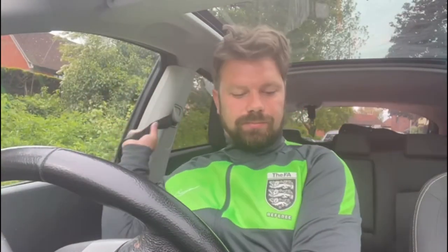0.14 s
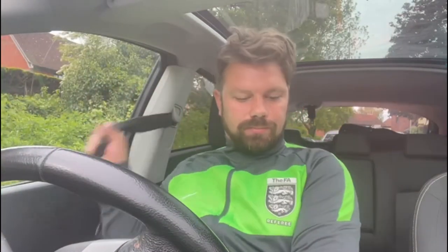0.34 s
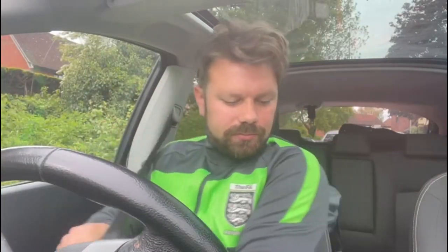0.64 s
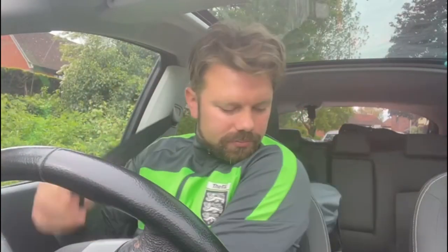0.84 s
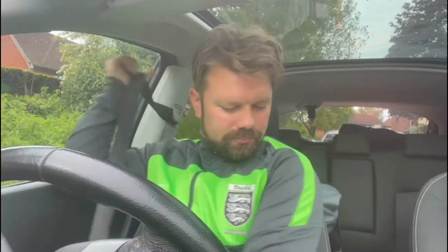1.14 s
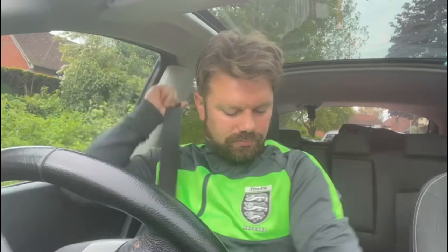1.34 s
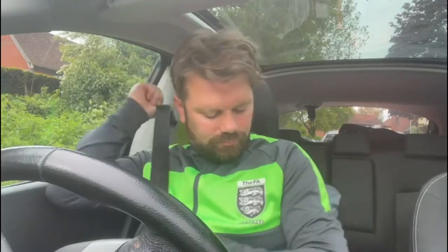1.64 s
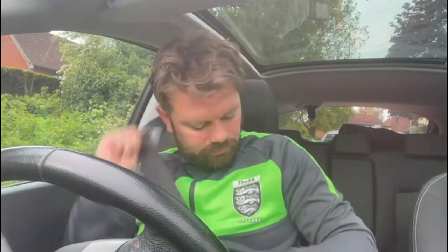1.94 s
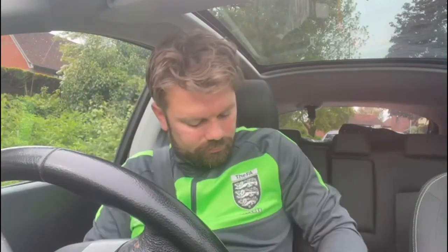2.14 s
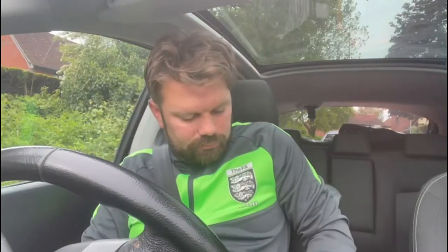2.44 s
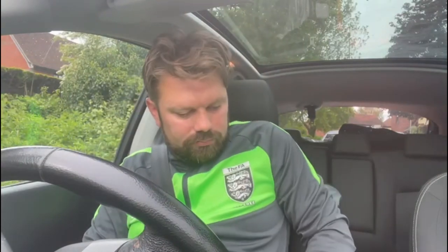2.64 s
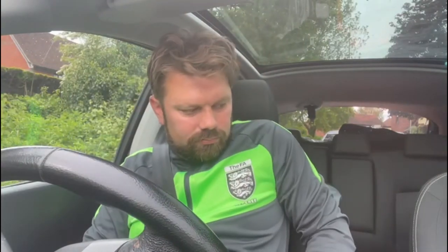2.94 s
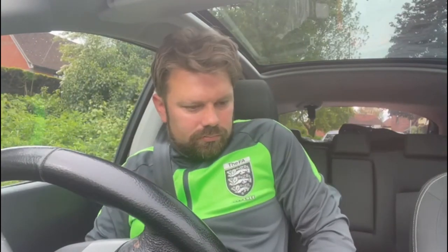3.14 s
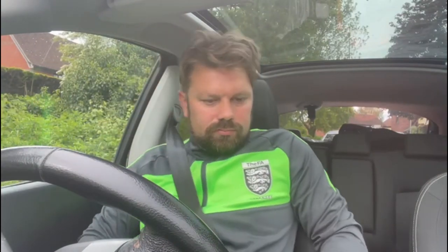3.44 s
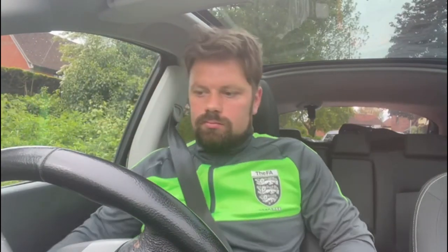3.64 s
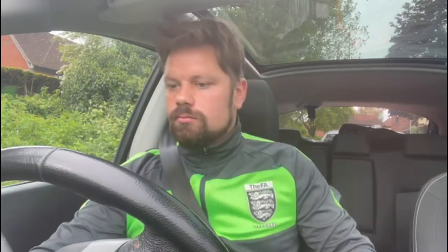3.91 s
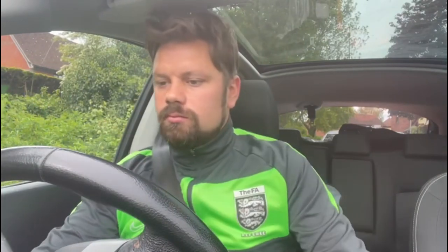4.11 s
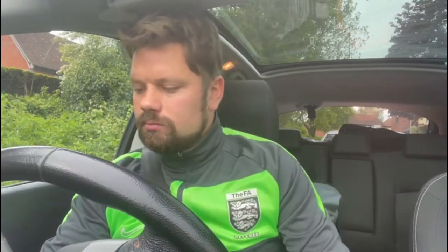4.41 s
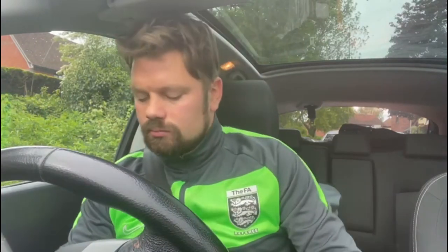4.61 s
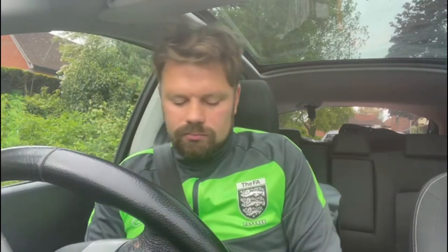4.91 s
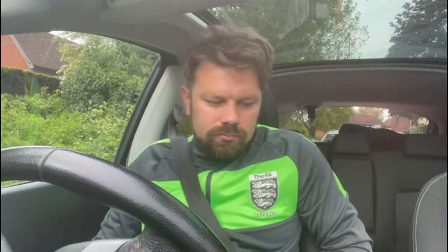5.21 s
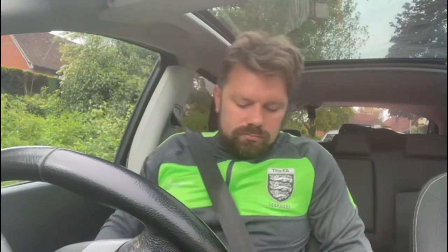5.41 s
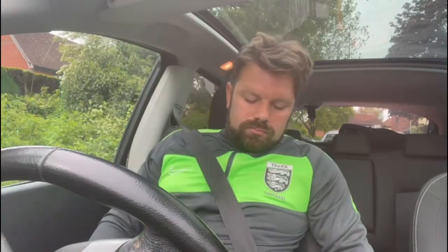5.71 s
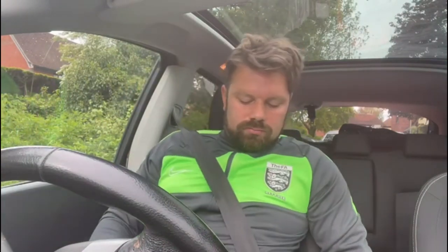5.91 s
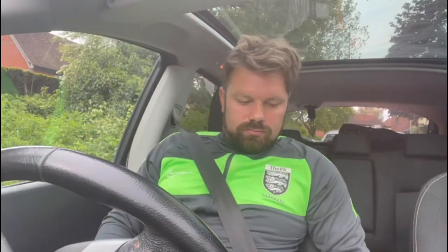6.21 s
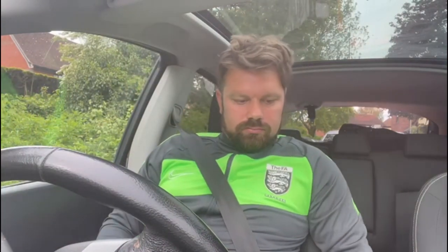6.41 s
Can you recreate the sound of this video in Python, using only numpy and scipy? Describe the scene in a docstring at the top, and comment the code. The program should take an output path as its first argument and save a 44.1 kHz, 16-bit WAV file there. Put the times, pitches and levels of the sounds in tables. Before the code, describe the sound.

Seat belt webbing zips through its guide in two rising and falling whines, followed by rattling buckle clicks, soft seat thumps and rustling clothes.

```python
"""Seat belt in a parked car

A driver pulls a seat belt out twice, fumbles the tongue into the buckle and settles back.
The ribs of the webbing whine over the guide loop as tones locked to belt speed; cloth, webbing and seat
move as filtered grainy noise, and scuffs as short noise swells. The metal tongue, plastic trim and cabin
answer blows as decaying modes, and thumps add a pitched push; two microphone ports listen."""
import sys
import numpy as np
from scipy import signal
from scipy.fft import rfft, irfft, next_fast_len
from scipy.io import wavfile

SR = 44100
rng = np.random.default_rng(int(sys.argv[2]) if len(sys.argv) > 2 else 0)


def store_pcm(level_fs):
    """Save levels as 16-bit WAV."""
    pcm = np.round(np.clip(level_fs, -1, 1) * 32767).astype(np.int16)
    wavfile.write(sys.argv[1], SR, np.atleast_2d(pcm).T)


N = 288987   # length in samples


def amp(db):
    """Logarithmic level: decibels to amplitude gain."""
    return 10 ** (np.asarray(db) / 20)


def rms_one(x):
    """Normalisation: scales to an rms of 1."""
    return x / np.sqrt(np.mean(x ** 2) + 1e-20)


def at_hz(points, hz):
    """Interpolation: reads a table on a log-frequency axis."""
    p = np.array(points, float)
    return np.interp(np.log(hz + 1), np.log(p[:, 0] + 1), p[:, 1])


def drift(rate):
    """Slow random fluctuation: noise low-passed near rate in Hz, with a spread of 1."""
    r = np.exp(-40 * np.pi * rate / SR)   # two equal poles, at a twentieth of the sample rate
    noise = rng.standard_normal(N // 20 + 2002)
    slow = signal.lfilter([1], [1, -2 * r, r * r], noise)[2000:]   # the filter has settled
    return np.interp(np.arange(N) / 20, np.arange(len(slow)), rms_one(slow))


def coloured(x, spectrum):
    """Spectral shaping: filters noise by a table of relative dB per Hz, to an rms of 1."""
    size = next_fast_len(N)
    hz = np.arange(size // 2 + 1) * SR / size
    return rms_one(irfft(rfft(x, size) * amp(at_hz(spectrum, hz)), size)[..., :N])


def ring(clicks, hz, t60):
    """Damped resonance: a unit click sets a sine of height 1 decaying by 60 dB in t60 seconds."""
    r, w = amp(-60 / (t60 * SR)), 2 * np.pi * hz / SR
    return signal.lfilter([0, np.sin(w)], [1, -2 * r * np.cos(w), r * r], clicks + 1e-18)


def sides(pan_db):
    """Level panning: left and right gains that differ by pan_db."""
    return amp(np.array([[.5], [-.5]]) * pan_db)


def strikes(times, db, pan_db):
    """Impulsive excitation: one stereo click for each blow."""
    out = np.zeros((2, N))
    out[:, np.round(times * SR).astype(int)] = amp(db) * sides(np.atleast_1d(pan_db))
    return out


def struck(times, db, pan_db, modes, spread_db):
    """Modal excitation: each blow wakes each mode with a random strength; modes alternate in sign."""
    chance = rng.standard_normal((len(times), len(modes)))
    out = np.zeros((2, N))
    for k, (hz, level, t60) in enumerate(modes):
        blows = strikes(times, db + level + spread_db * chance[:, k], pan_db)
        out += (-1) ** k * ring(blows, hz, t60)
    return out


# Belt speed in each of two pulls. Each row: time in seconds, ribs per second (Hz).
BELT_PULLS = [
    [(0.185, 455), (0.263, 1035), (0.287, 1258), (0.329, 1423), (0.373, 1497), (0.403, 1370), (0.447, 956),
     (0.485, 480), (0.53, 302)],
    [(1.73, 198), (1.77, 386.4), (1.802, 536), (1.884, 951), (1.936, 1250), (1.972, 1348), (2.006, 1225),
     (2.05, 953), (2.1, 447), (2.14, 246)],
]
FADE_S = .045   # the whine grows out of the rub and sinks back


def belt_speed(pull):
    """Kinematics: ribs per second through one pull, and a fade at its ends."""
    t, (s, hz) = np.arange(N) / SR, np.transpose(pull)
    fade = np.clip(np.minimum(t - s[0], s[-1] - t) / FADE_S, 0, 1)
    return np.interp(t, s, hz), fade


# The driver shifting. Each row: time in seconds, body rock, seat rumble, webbing rub
# and cloth rustle, all in dB.
DRIVER_SHIFTS = [(0.0, -44.5, -42, -51, -61.5), (0.33, -55, -44.5, -51, -55), (1.04, -65, -57, -72, -53),
                 (1.51, -46.5, -53, -56, -61), (1.75, -58, -48, -67.5, -74), (1.95, -58, -42.5, -41, -62),
                 (2.11, -47, -65, -59.5, -64), (2.37, -59, -47, -58.5, -80), (2.59, -63, -36, -59, -52.5),
                 (2.83, -33, -52, -87, -70), (2.97, -44, -48, -77, -62.5), (3.26, -48, -55, -62, -56.5),
                 (3.781, -55.5, -57.5, -65.5, -58.5), (4.12, -47.5, -52.5, -61, -74.5),
                 (5.0, -58, -66, -67.5, -55.5), (5.101, -40, -46, -50.5, -58),
                 (5.24, -38, -41.5, -47.5, -49), (5.42, -34, -48, -54, -55.5), (5.55, -38, -42, -51, -53),
                 (5.64, -45.5, -53, -61, -59.5), (6.09, -56.5, -60.5, -59, -55),
                 (6.55, -57, -79, -96, -60.5)]
# Running belt at 1400 ribs per second; the exponent sets growth with speed.
BELT_SEAT_DB, BELT_RUB_DB, BELT_HISS_DB, BELT_POWER = -50, -51.5, -55, 1.02
BELT_RASP_DB = -51   # bright rasp at 1400 ribs per second
SHAKE_SEAT_DB, SHAKE_RUB_DB, SHAKE_T60_S = -15, -30.5, 0.16   # wake of a thump, relative to its level


def stirring():
    """Superposed drives: the driver's shifting, the running belt and the decaying wake of each thump."""
    s, *levels = np.transpose(DRIVER_SHIFTS)
    rock, seat, web, cloth = amp([np.interp(np.arange(N) / SR, s, c) for c in levels])
    running = sum(fade * (hz / 1400) ** BELT_POWER for hz, fade in map(belt_speed, BELT_PULLS))
    at, db, *_ = np.transpose(SEAT_THUMPS)
    blows = strikes(at, db, 0)[0]
    wake = signal.lfilter([1], [1, -amp(-60 / (SHAKE_T60_S * SR))], blows + 1e-18)
    seat = seat + amp(BELT_SEAT_DB) * running + amp(SHAKE_SEAT_DB) * wake
    web = web + amp(BELT_RUB_DB) * running + amp(SHAKE_RUB_DB) * wake
    cloth = cloth + amp(BELT_HISS_DB) * running
    return rock, seat, web, cloth, amp(BELT_RASP_DB) * running ** 2


def friction(spectrum, grains_per_s, grain_db, flicker_db, flicker_hz, diffuse_db):
    """Stick-slip friction: fibres slip as noise plus uneven grains, partly from one place, partly diffuse."""
    sizes = amp(3.1 * np.minimum(rng.exponential(1, N), 3.0)) * rng.choice([-1, 1], N)
    slips = rng.random(N) < grains_per_s * amp(4.0 * drift(10)) / SR
    near = rng.standard_normal(N) + amp(grain_db) * rms_one(sizes * slips)
    spread = near + amp(diffuse_db) * rng.standard_normal((2, N))
    return rms_one(coloured(spread, spectrum) * amp(flicker_db * drift(flicker_hz)))


# Noise spectra of body rock, seat rumble, webbing rub and cloth rustle.
# Each row: frequency in Hz, relative level in dB per Hz.
ROCK_SPECTRUM = [(15, -31.5), (35, -12), (60, -13.5), (95, -13.5), (140, -17.5), (300, -74), (1000, -120)]
RUMBLE_SPECTRUM = [(12, -42.5), (45, -18), (114, -9), (151, -4), (215, -4.5), (316, -8), (397, -19),
                   (535, -34.5), (780, -22.5), (1320, -120)]
RUB_SPECTRUM = [(180, -32), (300, -9), (341, -6.5), (522, -0.5), (654, -9.5), (1200, -15), (2400, -28.5),
                (5000, -75)]
RUSTLE_SPECTRUM = [(710, 3), (1200, -3), (1500, -6.5), (2380, -2), (3710, -7.5), (4660, -7.5),
                   (5910, -12.5), (8280, -9), (9140, -13.5), (10100, -42.5), (11700, -8.5), (12100, -57.5),
                   (12800, -68.5), (16600, -89), (22000, -120)]
# Stereo balance. Each row: frequency in Hz, left minus right in dB.
STEREO_TILT = [(60, 1), (170, 4), (510, 3), (1480, 0.5), (4320, -1.5), (12600, 1)]
CLOTH_EDGES_HZ, CLOTH_PATCHY_DB = (1100, 1600, 2100, 2700, 3500, 5500), 5.0   # bands swell on their own
HISS_DB = -70.5   # steady hiss of the quiet cabin, before the stereo tilt


def movement():
    """Amplitude-modulated friction: seat, webbing and cloth noise follow the driver's effort."""
    rock, seat, web, cloth, rasp = stirring()
    rustle = friction(RUSTLE_SPECTRUM, 500, 1.5, flicker_db=2.0, flicker_hz=8, diffuse_db=4.0)
    below = [0]
    for hz in CLOTH_EDGES_HZ:
        below.append(signal.sosfilt(signal.butter(2, hz, fs=SR, output="sos"), rustle))
    below.append(rustle)
    bands = [high - low for low, high in zip(below, below[1:])]
    patchy = sum(band * amp(CLOTH_PATCHY_DB * drift(5.8)) for band in bands)

    out = rock * coloured(rng.standard_normal(N), ROCK_SPECTRUM)
    out = out + seat * friction(RUMBLE_SPECTRUM, 90, -2.5, flicker_db=0.6, flicker_hz=27, diffuse_db=-6.0)
    out = out + web * friction(RUB_SPECTRUM, 120, 0.0, flicker_db=2.0, flicker_hz=10.0, diffuse_db=5.5)
    out = out + cloth * patchy + rasp * rms_one(bands[-2])   # the rasp lies in the highest closed band
    out = out + amp(HISS_DB) * coloured(rng.standard_normal((2, N)), RUSTLE_SPECTRUM)
    size = next_fast_len(N)
    tilt = sides(at_hz(STEREO_TILT, np.arange(size // 2 + 1) * SR / size))
    return irfft(rfft(out, size) * tilt, size)[:, :N]


# Knocks on plastic trim. Each row: start in seconds, blow level in dB.
TRIM_KNOCKS = [(0.1, -24), (0.745, -38), (1.207, -39.5), (1.266, -17.5), (1.301, -29), (2.659, -29),
               (3.904, -22.5), (4.028, -38), (4.37, -23.5), (4.423, -36.5), (4.494, -20.5), (4.742, -48),
               (5.045, -39), (5.289, -35), (5.779, -46)]
# Modes of the trim. Each row: frequency in Hz, level in dB, 60 dB decay time in seconds.
TRIM_MODES = [(478.5, -1, 0.056), (536, -3, 0.047), (642, -4.5, 0.086), (780, 3, 0.012), (872, -2, 0.036),
              (1120, -25.5, 0.0023)]


def knocks():
    """Modal synthesis: hollow plastic answers each blow with dull, short modes."""
    s, db = np.transpose(TRIM_KNOCKS)
    return struck(s, db, 6, TRIM_MODES, spread_db=2.5)   # 6 dB to the left


# Thumps into seat and console. Each row: start in seconds, blow level in dB, pitch in Hz,
# 60 dB decay time in seconds.
SEAT_THUMPS = [(0.109, -45, 244, 0.1), (0.164, -29, 284, 0.22), (0.5, -23.5, 193, 0.12),
               (0.744, -27.5, 201, 0.21), (0.933, -37, 291.6, 0.35), (1.198, -26.5, 196, 0.15),
               (1.264, -4, 304, 0.046), (1.299, -8.5, 121.7, 0.14), (1.613, -36, 144, 0.39),
               (1.695, -34.5, 191, 0.33), (2.332, -25, 205, 0.058), (2.467, -15.5, 300.4, 0.13),
               (2.48, -21, 163, 0.2), (2.5, -19, 252, 0.067), (2.564, -15, 222, 0.2),
               (2.605, -17, 225.4, 0.14), (2.663, -17, 304, 0.16), (2.787, -9.5, 228, 0.065),
               (2.825, -21.5, 118.6, 0.26), (2.93, -15, 287, 0.14), (2.932, -16.5, 175, 0.11),
               (3.001, -14, 326, 0.051), (3.158, -22, 300, 0.078), (3.283, -33, 115, 0.23),
               (3.469, -34.5, 182, 0.15), (3.785, -33, 176, 0.19), (4.031, -25.5, 104.7, 0.32),
               (4.067, -27.5, 177, 0.19), (4.094, -22, 161, 0.063), (4.309, -32, 138, 0.12),
               (4.511, -27, 95.2, 0.32), (4.748, -36, 132, 0.038), (5.044, -29, 205, 0.15),
               (5.189, -26, 109.4, 0.36), (5.246, -21.5, 70.5, 0.18), (5.29, -11, 220, 0.15),
               (5.304, -36, 160, 0.078), (5.319, -22, 91.7, 0.56), (5.398, -33, 203, .3),
               (5.459, -24.5, 108.7, 0.71), (5.779, -32, 201, 0.094), (6.195, -30, 96, 0.19),
               (6.419, -30.5, 120, 0.057)]
# Low modes of the cabin. Each row: frequency in Hz, level in dB, 60 dB decay time in seconds.
CABIN_MODES = [(86, -5.5, 0.19), (118.04, -1.5, 0.32), (159.6, -9, 0.48), (251.4, -1, 0.021),
               (332, -8.5, 0.049)]
CABIN_DB, CABIN_PAN_DB = -20, 9.0   # mode level; spread of balance between the two ports
THUMP_RISE_S, THUMP_PAN_DB, CRUSH_DB = 0.004, 5.5, -9.5   # padding noise is at CRUSH_DB for a 300 Hz thump


def thumps():
    """Soft impact: a push rings at its own pitch, crushes the padding and wakes the cabin modes."""
    s, db, *_ = np.transpose(SEAT_THUMPS)
    pans = THUMP_PAN_DB + CABIN_PAN_DB * rng.standard_normal(len(s))
    out = amp(CABIN_DB) * struck(s, db, pans, CABIN_MODES, spread_db=5.0)
    t = np.arange(SR // 3) / SR
    soft_band = signal.butter(2, [150, 400], "band", fs=SR, output="sos")
    padding = rms_one(signal.sosfilt(soft_band, rng.standard_normal(N)))
    for at, level, hz, t60 in SEAT_THUMPS:
        i = round(at * SR)
        rise = np.minimum(t / THUMP_RISE_S, 1)
        shape = (rise * amp(level - 6.0 - 60 * t / max(t60, .02)))[:N - i]
        part = slice(i, i + len(shape))
        push = np.sin(2 * np.pi * hz * t)[:N - i]
        crush = amp(CRUSH_DB) * hz / 300 * padding[part]
        out[:, part] += sides(THUMP_PAN_DB) * shape * (push + crush)
    return signal.sosfilt(signal.butter(4, 480, fs=SR, output="sos"), out)


# Spectral lines of the weave; its pattern repeats every fifth rib.
# Each row: multiple of the rib rate, level in dB.
WEAVE_LINES = [(.2, -8), (.4, -3), (.6, -14), (.8, -5), (1.001, 10), (2.001, 3), (3.001, -12)]
# Whine of each pull. Each row: level at start in dB, level at end in dB, weave pattern gain in dB.
PULL_WHINES = [(-42.5, -67, -10), (-53.5, -51, -3.5)]
# Resonance of the guide loop and pillar trim. Each row: frequency in Hz, gain in dB.
LOOP_RESONANCE = [(200, 5.5), (380, 7), (500, 16), (650, 2.5), (830, 10), (1020, 1.5), (1280, 3.5),
                  (1480, -9), (1900, -12), (2600, -8), (3000, -4), (4500, -1)]
WHINE_ROUGH_DB = 2.5   # spread of each line's wavering
OVERTONE_DB_PER_OCTAVE = 10.0   # with belt speed, about 1400 ribs per second


def belt_whine():
    """Periodic excitation: ribs pass the loop, so pitch follows belt speed; the weave adds weaker lines."""
    out, wobble, rough = np.zeros(N), drift(60), [drift(40) for _ in WEAVE_LINES]
    for pull, (start_db, end_db, pattern_db) in zip(BELT_PULLS, PULL_WHINES):
        speed, fade = belt_speed(pull)
        on = fade > 0
        speed = speed[on]
        phase = 2 * np.pi * np.cumsum(speed * (1 + 0.00098 * wobble[on])) / SR
        sharp_db = OVERTONE_DB_PER_OCTAVE * np.log2(speed / 1400)   # faster ribs strike more sharply
        lines = 0
        for (k, level), uneven in zip(WEAVE_LINES, rough):
            line_db = level + at_hz(LOOP_RESONANCE, k * speed) + WHINE_ROUGH_DB * uneven[on]
            line_db = line_db + pattern_db * (k < 1) + sharp_db * (k > 1)
            lines = lines + amp(line_db) * np.sin(k * phase)
        swell = amp(np.linspace(start_db, end_db, len(speed)))
        out[on] = np.sqrt(2) * fade[on] * swell * lines
    return out


# Contacts of tongue, buckle and belt hardware. Each row: start in seconds, level in dB,
# clatter 60 dB decay time in seconds, treble gain of the clatter in dB, ring gain in dB,
# clack pitch in Hz, clack gain in dB.
HARD_CONTACTS = [(0.4459, -27.5, 0.019, -21, -17, 3860, -29), (0.5, -40, 0.065, -11, -16, 1780, -55),
                 (0.592, -41, 0.029, -13, -1, 2520, -38.5), (0.61, -41, .05, 7, -3, 2260, -47),
                 (0.647, -29.5, 0.02, 1, -24, 2150, -56), (0.74, -28.5, 0.09, 0, -9, 1667, -38.5),
                 (1.263, -24, 0.013, 0, -29, 1200, -16.5), (1.721, -60.5, 0.21, 14.5, 13.5, 3020, -59),
                 (2.3116, -29, 0.013, 5, 3, 2140, -25), (2.3376, -24.5, 0.012, 6, -1, 2250, -27.5),
                 (2.4615, -30, 0.092, -1, 3.5, 2060, -32.5), (2.596, -26, 0.019, 13.5, 3.5, 2110, -23.5),
                 (2.62, -38, .04, -10, 6, 2050, -39), (2.645, -37, .04, 0, 1, 2300, -41),
                 (2.6575, -14.5, 0.011, 12.5, -2.5, 1890, -7.5), (2.7187, -31, 0.03, 13.5, 9.5, 2060, -28),
                 (2.7502, -39.5, 0.063, 13, 10, 2100, -43), (2.78, -12, 0.015, -15, -8, 2080, -11.5),
                 (2.8102, -26, 0.014, 13.5, 4.5, 2130, -16.5), (2.8968, -46, 0.16, 16.5, -12, 2100, -44),
                 (2.91, -36, 0.036, 13, 0, 1940, -30), (2.9234, -28, 0.061, 16, -9, 1990, -27.5),
                 (2.9472, -34, 0.21, 7.5, 5.5, 2076, -41), (2.9912, -18, 0.037, 17, 1.5, 2115, -12.5),
                 (3.0212, -38, 0.035, 13, 7, 2080, -40), (3.1482, -25.5, 0.032, 8.5, -14, 2110, -25.5),
                 (3.2174, -41.5, 0.044, -7, -11, 2100, -53), (3.7896, -43, 0.018, 13.5, 10, 1690, -40),
                 (3.902, -48.5, 0.39, 2, -10, 2250, -64), (4.0622, -29.5, 0.032, -14, -35, 1780, -52),
                 (4.4928, -21, 0.02, 0, -7, 4260, -28.5), (5.0264, -35.5, 0.083, -6, -18, 2010, -52),
                 (5.238, -34, 0.04, 4, -9, 2110, -53), (5.5092, -44, 0.03, 9, -15, 2300, -46),
                 (5.63, -34, 0.021, 6.5, -13, 2100, -68), (5.8242, -39, 0.1, 13, 6, 7770, -42),
                 (5.937, -30, 0.077, 4.5, -2, 2660, -37), (6.055, -50, 0.015, 16, -10, 2600, -26),
                 (6.058, -43.5, 0.029, 23, -10, 4700, -29.5), (6.0955, -53, 0.1, 22, 11.5, 1950, -52),
                 (6.161, -52, 0.045, 21.5, 13, 2645, -38), (6.229, -41.5, 0.016, -1, -7, 7600, -32),
                 (6.463, -43, 0.03, 3, -3, 2200, -56)]
# Modes of the metal. Each row: frequency in Hz, level in dB, undamped 60 dB decay time in seconds.
METAL_MODES = [(1250, -28, 0.05), (1675, -8.5, 0.028), (2067, 10.5, 0.0035), (2140, -2.5, 0.036),
               (2983, -11.5, 0.061), (3242, -6, 0.07), (4690, -13, 0.055), (5130, -8, 0.068),
               (5860, -19, 0.052), (6950, -15, 0.04), (7590, -18, 0.05), (7720, -25, 0.038),
               (8200, -15, 0.04)]
# Noise spectrum of the clatter. Each row: frequency in Hz, relative level in dB per Hz.
CLATTER_SPECTRUM = [(530, -7), (900, 7), (1330, -1.5), (2120, -5), (2610, -12), (3230, -4.5), (3810, -15.5),
                    (4820, -12.5), (6570, -12), (7940, -17), (11100, -22), (12200, -24), (12800, -62),
                    (16600, -96), (22000, -120)]
CLATTER_DB, RING_DB, RATTLES_PER_S = -7.5, -17.5, 1100
CLICK_RISE_S, CLICK_PAN_DB = 0.0035, 2.0   # onset time; spread of place
TOUCH_DB = -6   # the main touch against the rattles around it
CLACK_T60_S, CLACK_SHARE = .035, .6   # longest clack decay; share of the clatter's decay
TURN_DB = 4.0   # how unevenly the modes are hit
HAND_DAMPING_S = .045   # the grip holds every metal decay within this time


def clicks():
    """Hard contact: loose clatter swells and dies; the main touch and tiny rattles ring the modes."""
    noise = coloured(rng.standard_normal(N), CLATTER_SPECTRUM)
    treble = signal.sosfilt(signal.butter(2, 3500, "high", fs=SR, output="sos"), noise)
    rattles = rng.standard_normal(N) * (rng.random(N) < RATTLES_PER_S / SR)
    out, drive, t = np.zeros((2, N)), np.zeros((2, N)), np.arange(SR // 7) / SR
    touch = round(CLICK_RISE_S * SR)   # the main touch falls at the top of the swell
    rise, after = np.minimum(t / CLICK_RISE_S, 1), np.maximum(t - CLICK_RISE_S, 0)
    for at, level, t60, bright_db, ring_db, clack_hz, clack_db in HARD_CONTACTS:
        i, place = round(at * SR), sides(CLICK_PAN_DB * rng.standard_normal())
        shape = (rise * amp(level - 60 * after / max(t60, .01)))[:N - i]
        part = slice(i, i + len(shape))
        clatter = noise[part] + (amp(bright_db) - 1) * treble[part]
        out[:, part] += place * amp(CLATTER_DB) * shape * clatter
        # the part hit most squarely rings out as the clack
        nudge = shape / amp(level) * rattles[part] * 0.47
        nudge[touch] += amp(TOUCH_DB)
        out[:, part] += place * amp(clack_db) * ring(nudge, clack_hz, min(CLACK_T60_S, CLACK_SHARE * t60))
        drive[:, part] += place * amp(ring_db) * shape * rattles[part]
        drive[:, i + touch] += place[:, 0] * amp(level + ring_db + TOUCH_DB)
    for k, (hz, db, t60) in enumerate(METAL_MODES):
        uneven = drive * amp(TURN_DB * drift(7.7))   # hit more or less squarely as the tongue turns
        out += amp(RING_DB + db) * (-1) ** k * ring(uneven, hz, min(t60, HAND_DAMPING_S))
    return out


# Scuffs of webbing, cloth and sliding parts. Each row: middle in seconds, level in dB,
# half length (Gaussian width) in seconds, centre frequency in Hz.
SHORT_SCUFFS = [(0.813, -53.5, 0.017, 2140), (1.07, -59, 0.015, 297), (1.275, -48, 0.027, 2880),
                (1.613, -56, 0.018, 3300), (2.437, -38, 0.0059, 1860), (2.455, -47.5, 0.031, 3270),
                (2.563, -45.5, 0.005, 1990), (2.782, -24.5, 0.0043, 5100), (2.919, -40.5, 0.0059, 5150),
                (3.138, -42.5, 0.0067, 3880), (3.279, -50, 0.013, 1700), (4.029, -52.5, 0.014, 1780),
                (4.071, -44, 0.0098, 2010), (4.095, -53, 0.01, 4640), (4.376, -54.5, 0.033, 2290),
                (4.616, -57, 0.038, 506), (4.748, -54, 0.018, 2370), (5.55, -59, 0.044, 2280),
                (5.79, -46.5, 0.0083, 1820), (5.884, -44.5, 0.032, 5700), (5.893, -42.5, 0.027, 2300),
                (5.942, -39.5, 0.008, 1720), (5.943, -41.5, 0.013, 780), (6.133, -44, 0.023, 7250),
                (6.17, -50.5, 0.027, 546), (6.21, -46.5, 0.016, 7440), (6.396, -44.5, 0.019, 1670),
                (6.43, -63, .008, 2180)]
SCUFF_OCTAVES, SCUFF_GRAIN_DB = 0.84, 4.0   # band edges either side of the centre; spread of the grain


def scuffs():
    """Band-limited friction: each short slide is a swell of grainy noise around its own colour."""
    noise = rng.standard_normal((2, N)) * amp(SCUFF_GRAIN_DB * drift(250))
    grainy = noise[0] + 0.4 * noise[1] * [[1], [-1]]   # shared part plus an opposed part
    out, half = np.zeros((2, N)), SR // 10
    t = np.arange(-half, half) / SR
    for at, db, width, hz in SHORT_SCUFFS:
        part = slice(round(at * SR) - half, round(at * SR) + half)
        edges = np.clip(hz * 2 ** (SCUFF_OCTAVES * np.array([-1, 1])), 100, 15000)
        band_pass = signal.butter(2, edges, "band", fs=SR, output="sos")
        band = rms_one(signal.sosfilt(band_pass, grainy[:, part]))
        out[:, part] += amp(db) * np.exp(-.5 * (t / width) ** 2) * band
    return out


ECHO_T60_S = 0.07


def ports(x, lead, echo_db):
    """Phase difference: path difference to two ports, and comb echoes off glass and roof."""
    size = next_fast_len(N + SR // 2)
    hz = np.arange(size // 2 + 1) * SR / size
    lags = rng.uniform(.002, .009, (6, 2, 1))   # seconds; each port has its own
    echoes = 0
    for k, lag in enumerate(lags):
        loop_gain = amp(-60 * lag / ECHO_T60_S) * np.exp(-2j * np.pi * hz * lag)
        echoes = echoes + (-1) ** k / (1 - loop_gain)
    direct = np.exp(1j * np.array([[0], [-1]]) * np.interp(hz, *np.transpose(lead)))
    return irfft(rfft(x, size) * (direct + amp(echo_db) * echoes), size)[:, :N]


# Phase lead of the left port for sounds near the shoulder, at the loop and near the hip.
# Each row: frequency in Hz, lead in radians.
SHOULDER_LEAD = [(0, 0), (780, 2.5), (1290, 3.4), (1720, 0.4), (3010, 9.2), (4910, 12.8), (5770, 15.8),
                 (6370, 16.0), (7060, 12.8), (8870, 12.4), (9220, 9.7), (10900, 9.2), (11300, 6.3),
                 (12700, 6.2)]
LOOP_LEAD = [(0, 0), (260, -.1), (1810, -9.4), (5000, -24.0)]
HIP_LEAD = [(0, 0), (1210, 3.9), (1640, 0.3), (2500, -0.1), (3270, -2.0), (3620, -0.3), (4310, -5.7),
            (4910, -6.1), (5680, -3.5), (6460, -3.1), (7580, -5.7), (10600, -10.0), (11500, -12.3),
            (12700, -12.9)]
SHOULDER_ECHO_DB, BUCKLE_ECHO_DB, SEAT_ECHO_DB = -15, -8, -20


def scene():
    """Superposition: cloth, scuffs and trim near the shoulder, the pillar loop, buckle and seat near the hip."""
    upper = movement() + scuffs() + knocks()
    loop = belt_whine() * sides(11.5)
    out = ports(upper, SHOULDER_LEAD, SHOULDER_ECHO_DB)
    out = out + ports(loop, LOOP_LEAD, SHOULDER_ECHO_DB)
    out = out + ports(clicks(), HIP_LEAD, BUCKLE_ECHO_DB)
    return out + ports(thumps(), HIP_LEAD, SEAT_ECHO_DB)


MIC_LOW_HZ, CUTOFF_HZ = 37.3, 13400


def record(dry):
    """Band limiting: the microphone loses the deepest bass; the top is cut steeply."""
    thin = signal.sosfilt(signal.butter(2, MIC_LOW_HZ, "high", fs=SR, output="sos"), dry)
    return signal.sosfilt(signal.cheby2(12, 70, CUTOFF_HZ, fs=SR, output="sos"), thin)


dry = scene()
out = record(dry)
store_pcm(out)
```